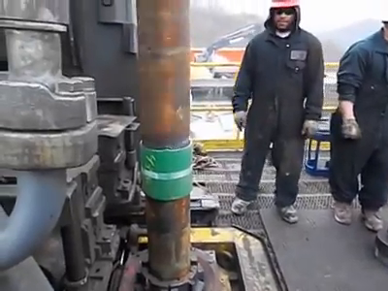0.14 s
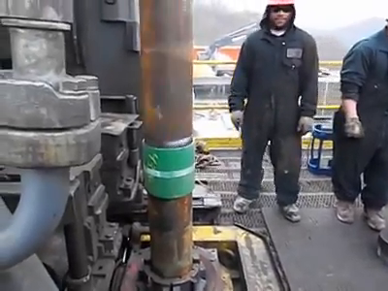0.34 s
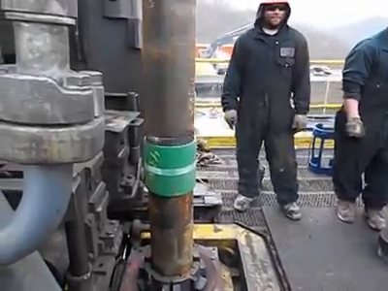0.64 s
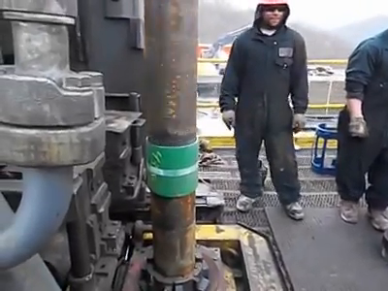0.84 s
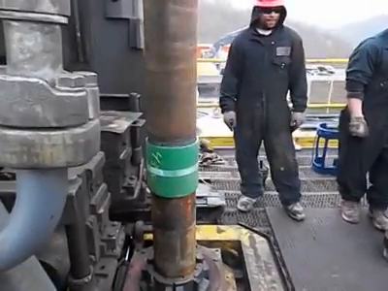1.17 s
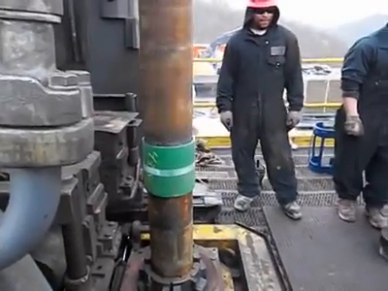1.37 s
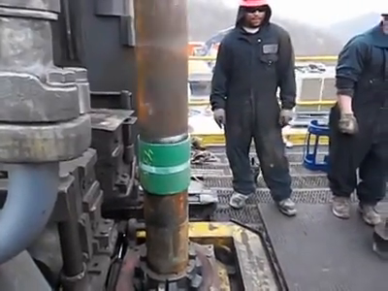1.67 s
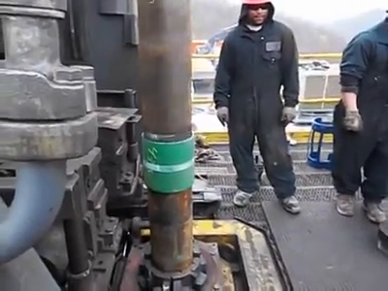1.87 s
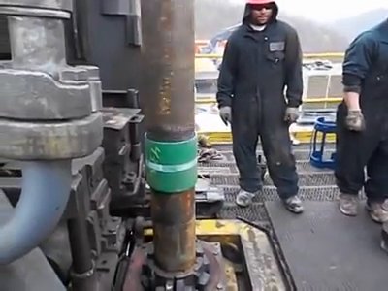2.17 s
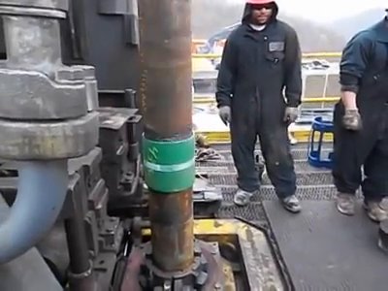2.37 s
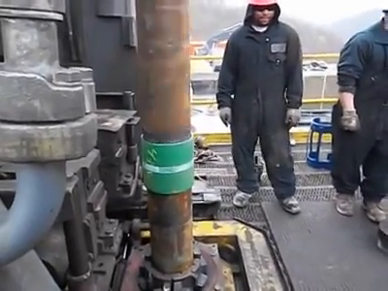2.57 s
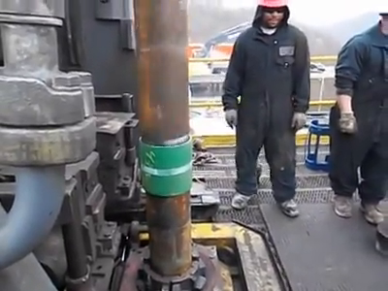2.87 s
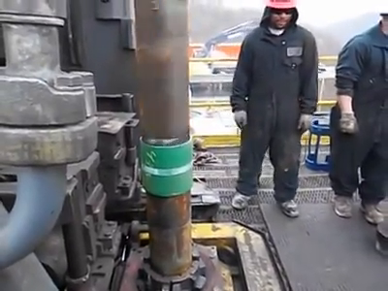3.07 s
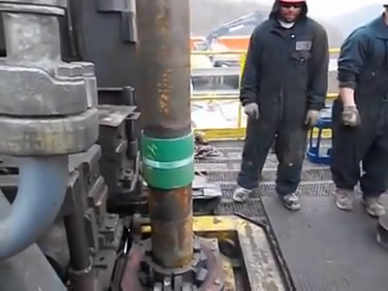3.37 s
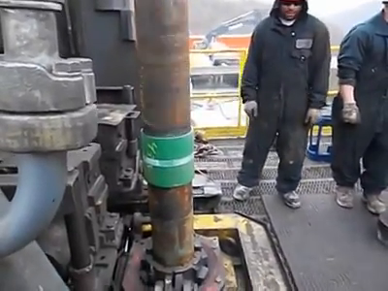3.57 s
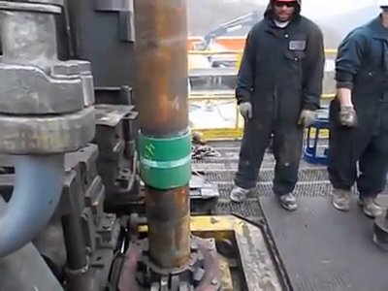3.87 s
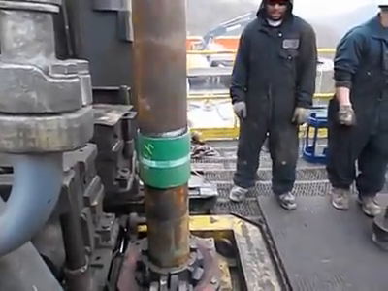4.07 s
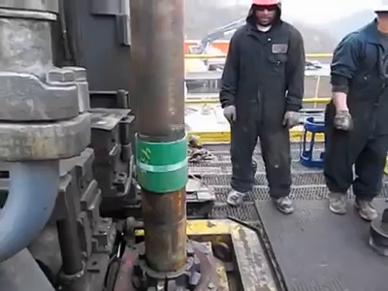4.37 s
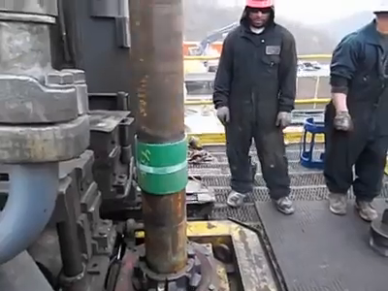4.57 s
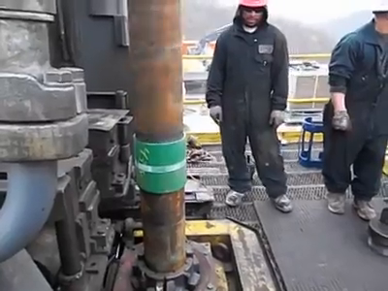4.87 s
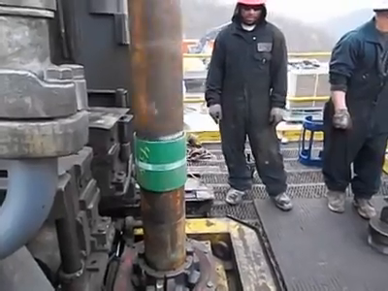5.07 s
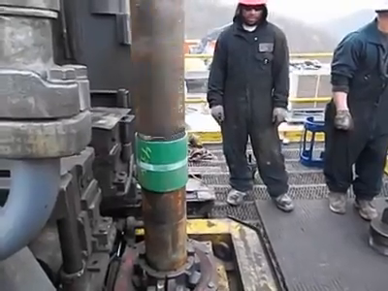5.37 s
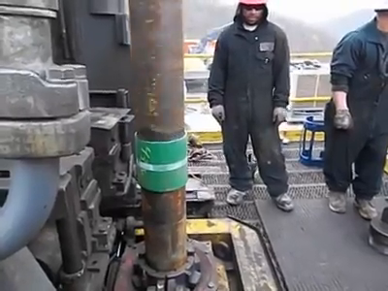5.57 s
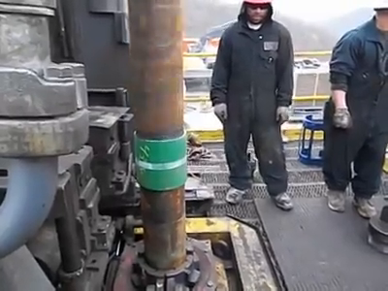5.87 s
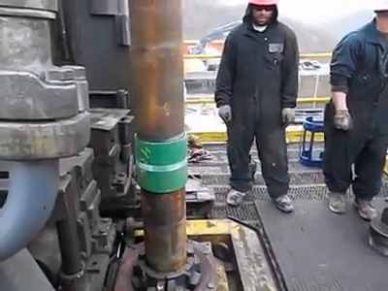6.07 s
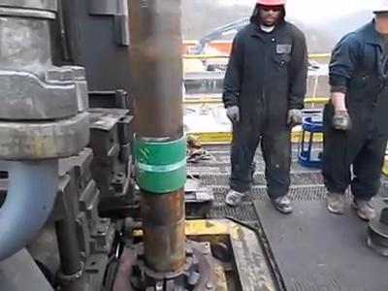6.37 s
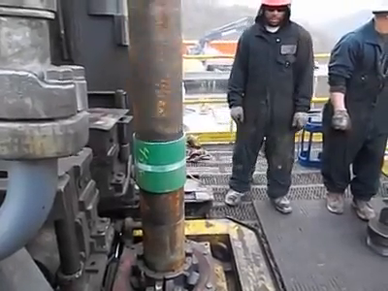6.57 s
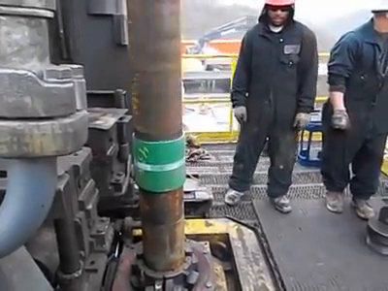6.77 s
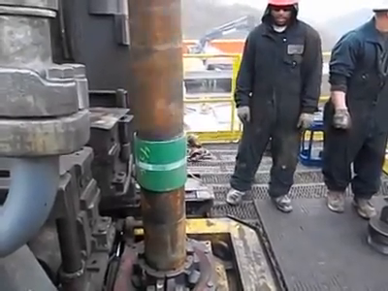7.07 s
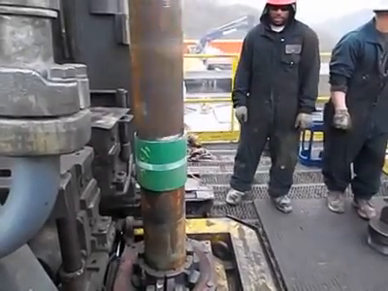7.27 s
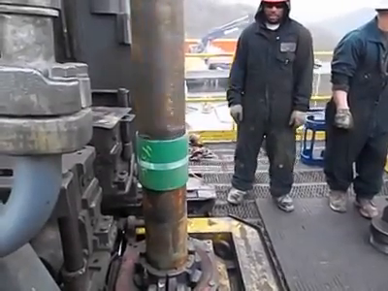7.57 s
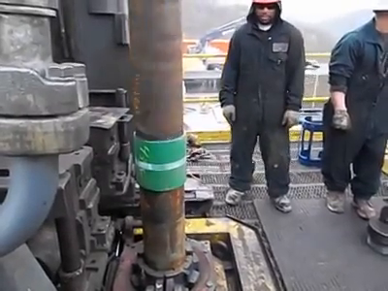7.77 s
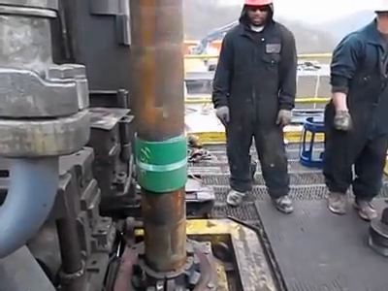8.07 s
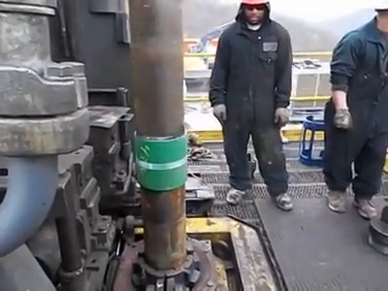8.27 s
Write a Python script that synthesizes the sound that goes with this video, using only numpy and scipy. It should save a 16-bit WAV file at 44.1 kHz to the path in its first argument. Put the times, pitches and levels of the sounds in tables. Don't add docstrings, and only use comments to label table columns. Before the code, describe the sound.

From start to end a diesel runs at constant speed, a dense, rough drone with a rapid flutter of about thirty pulses a second, under a thick midrange roar of air and oil. A geared hydraulic pump whines around 1.6 to 2.2 kHz, its tones swelling strongest in the first three seconds. Light knocks come at 0.3-0.5 s, a hard cluster at 1.05-1.2, and a deck boom near 1.5. A motor hums in spurts around 320 Hz, clearest at 2-3 s, while knocks are sparse. Heavy thuds with loose rattling hit at 4.1 and 4.5-5.05 s. Low booms continue from 5.6 to 6; the biggest blow lands at 6.6-6.7, with more at 6.9 and 7.2. A low deck shudder swells near 7.9, and the drone continues to 8.4. Faint wind buffets the small microphone, which clips, ducks after blows and lacks high treble.

```python
import sys
import numpy as np
from scipy import signal
from scipy.fft import irfft
from scipy.io import wavfile
from scipy.ndimage import uniform_filter1d, map_coordinates

SR = 44100
rng = np.random.default_rng(int(sys.argv[2]) if len(sys.argv) > 2 else 0)


def bounce(signal):
    frames = np.transpose(np.atleast_2d(signal))
    limited = np.clip(frames, -1, 1)
    pcm = np.round(limited * 32767).astype(np.int16)
    wavfile.write(sys.argv[1], SR, pcm)


def invert_db(level):
    return 10 ** (np.asarray(level, dtype=float) / 20)


N = 371763

# t/s, f/Hz
CYCLE_RATE = [(0.15, 15.012), (0.6, 15.022), (1.1, 15.0), (1.65, 14.905), (1.95, 14.958), (3.45, 15.0),
              (4.8, 14.99), (6.3, 14.953), (6.9, 14.975), (7.6, 14.952), (7.95, 14.915), (8.25, 14.936)]
# t/s, peak level/dB, f/Hz
KNOCKS = [(0.288, -14, 270), (0.375, -11, 272), (0.549, -18, 200), (1.049, -3, 305), (1.117, -9, 204),
          (1.158, -11, 250), (1.191, -9.5, 273), (1.482, -14, 202), (1.992, -18, 295.7), (2.106, -17, 323),
          (2.314, -17.5, 310), (3.623, -11, 310), (4.119, -1, 297), (4.318, -10, 301), (4.532, -4, 235),
          (4.597, -9, 324), (4.625, -11, 300), (4.713, -3.5, 217), (4.934, -2.5, 270), (4.987, -7, 287),
          (5.043, -8.5, 235), (6.26, -11, 202), (6.63, 0, 295.8), (6.713, -9, 202), (6.739, -14, 202),
          (6.909, -3.5, 239), (7.19, -5, 289), (7.654, -23, 323)]


def rms_one(x):
    return x / np.sqrt(np.mean(x ** 2) + 1e-20)


def at_hz(points, hz):
    f, db = np.transpose(points)
    return np.interp(np.log(hz), np.log(f), db)


def drift(rate):
    r = np.exp(-80 * np.pi * rate / SR)
    slow = signal.lfilter([1], [1, -2 * r, r * r], rng.standard_normal(N // 40 + 2002))[2000:]
    return np.interp(np.arange(N) / 40, np.arange(len(slow)), rms_one(slow))


def band(x, low_hz, high_hz):
    return signal.sosfilt(signal.butter(2, [low_hz, high_hz], "band", fs=SR, output="sos"), x)


def swells(rows, rest_db, fade_s, t):
    power = invert_db(2 * rest_db) + 0 * t
    for start, length, *_, db in rows:
        inside = np.minimum(t - start, start + length - t) / fade_s + .5
        power = power + invert_db(2 * db) * np.clip(inside, 0, 1) ** 2
    return 10 * np.log10(power)


def drive_train(turns, scatter_db, unsteady, memory):
    # multiple of the cycle rate, rms level/dB
    strong_orders = [(6, -34), (10, -23), (12, -21), (14, -38), (18, -33), (20, -35), (21, -33), (28, -34),
                     (30, -34), (32, -39), (39, -38), (44, -38), (45, -39), (46, -37), (47, -40), (51, -35),
                     (52, -39), (54, -31), (58, -39), (60, -37), (66, -36), (67, -36), (69, -38), (70, -40),
                     (74, -41), (81, -42), (90, -40), (102, -41), (118, -41), (124, -40)]
    # f/Hz, rms level/dB of each
    weak_orders = [(30, -57), (100, -41.5), (300, -37.5), (500, -45.5), (1000, -47.5), (1300, -55),
                   (1600, -47.5), (1800, -48), (1980, -44.5), (2200, -59.5), (3400, -60)]
    # pump harmonic, rms level/dB
    steady_whine = [(9, -51), (10, -49)]
    whine_rest = [-41.5, -39, -37, -45.5]
    # start t/s, length t/s, rms level/dB
    whine_swells = [
        [(1.45, .33, -31), (5.6, .55, -39), (7.85, .35, -31.5)],
        [(0.0, 1.0, -31.5), (1.4, 1.15, -32), (3.2, 2.25, -33), (5.5, 1.0, -36.5), (7.6, .8, -40.5)],
        [(0.0, 1.3, -31.5), (1.72, 1.0, -28.5), (3.2, .9, -34), (4.4, 1.72, -36), (8.2, .3, -34.5)],
        [(0.2, .9, -38.5), (2.3, .4, -37.5), (3.2, 1.3, -43), (5.1, 1.0, -37), (7.95, .5, -37.5)],
    ]
    piston_order = 21
    count, size = int(turns[-1]) + 2, 4096
    orders = np.arange(1, 231)
    starts = np.interp(np.arange(count), turns, np.arange(N) / SR)

    scatter = np.clip(rng.standard_normal(len(orders)), -2, 1.3)
    level_db = at_hz(weak_orders, orders * CYCLE_RATE[0][1]) + scatter_db * scatter
    strong_at = [round(order) - 1 for order, db in strong_orders]
    level_db[strong_at] = [db for order, db in strong_orders]
    for k, db in steady_whine:
        level_db[round(k) * piston_order - 1] = db
    level_db = np.tile(level_db, (count, 1))
    singing = [swells(rows, rest_db, 0.09, starts) for rows, rest_db in zip(whine_swells, whine_rest)]
    level_db[:, np.arange(5, 9) * piston_order - 1] = np.transpose(singing)

    chance = rng.standard_normal((count + 20, len(orders), 2)) @ [1, 1j]
    r = np.clip(memory, 0, .97)
    wander = signal.lfilter([np.sqrt((1 - r * r) / 2)], [1, -r], chance, axis=0)[20:]
    share = unsteady * np.minimum(orders / 40, 1) ** 0.44
    share[np.arange(5, 11) * piston_order - 1] *= .55
    share[strong_at] *= .55

    phase = rng.random(len(orders)) * ~np.isin(orders, [10, 12])
    unsteadiness = (1 + share * wander) / np.sqrt(1 + share ** 2)
    lines = np.zeros((count, size // 2 + 1), complex)
    lines[:, orders] = invert_db(level_db) * np.exp(2j * np.pi * phase) * unsteadiness
    cycles = irfft(lines, axis=1) * size / np.sqrt(2)
    cycles = np.hstack([cycles, cycles[:, :1]])
    return map_coordinates(cycles, [turns, turns % 1 * size], order=1)


def other_drives(wobble_hz, sway_db):
    # f/Hz, rms level/dB
    hums = [(43, -47.5), (558, -35), (585, -44.5), (7716, -66)]
    t = np.arange(N) / SR
    out = 0
    for hz, db in hums:
        strength = invert_db(db + sway_db * drift(0.78)) * np.sqrt(2)
        cycles = hz * t + wobble_hz * np.cumsum(drift(1.74)) / SR
        out = out + strength * np.sin(2 * np.pi * cycles)
    return out


def roar(turns, patchy_db, throb_db, clatter_db):
    # f/Hz, density level/dB
    turbulence = [(15, -47), (25, -23.5), (60, -14), (110, -17), (170, -9), (260, -4.5), (350, -11),
                  (620, -13.5), (1000, -13.5), (1400, -16), (1930, -13.5), (2400, -22), (3700, -22),
                  (5000, -33.5), (9000, -54)]
    white = rng.standard_normal((2, N))
    edges = 24 * 2 ** np.arange(0, 8.6, 1 / 3)
    firing = 6 * turns
    strength = rng.exponential(1, int(firing[-1]) + 1)[firing.astype(int)]
    throb = throb_db * np.cos(4 * np.pi * turns)
    pulse = clatter_db * strength * np.exp(-3.0 * (firing % 1))
    together = .5 * drift(6) + 1.0 * drift(18)
    out = 0
    for k, (low, high) in enumerate(zip(edges, edges[1:])):
        hz = np.sqrt(low * high)
        exhaust = np.exp(-np.log2(hz / 700) ** 2 / 2.0)
        flicker = patchy_db * (together + drift(13))
        level_db = at_hz(turbulence, hz) + flicker + pulse + exhaust * throb
        out = out + invert_db(level_db) * band(white[k % 2], low, high)
    return invert_db(-18.5) * rms_one(out)


def exhaust_pops(turns):
    low_hz, high_hz = 200, 1090
    at = np.flatnonzero(np.diff(np.floor(2 * turns - .07)))
    kicks = np.zeros(N)
    kicks[at] = -invert_db(5 * np.clip(rng.standard_normal(len(at)), -2, 1.5))
    shape = band(np.eye(1, SR // 20)[0], low_hz, high_hz)
    return invert_db(-15.5) * band(kicks + 1e-18, low_hz, high_hz) / shape.max()


def housing():
    # f/Hz, bandwidth f/Hz, rms level/dB
    casting_modes = [(988.4, 58, -32), (539.7, 50, -35)]
    out = 0
    for hz, width, db in casting_modes:
        sway = invert_db(db + 2.0 * drift(2.2))
        out = out + sway * rms_one(band(rng.standard_normal(N), hz - width / 2, hz + width / 2))
    return out


def wind():
    # start t/s, length t/s, rms level/dB
    gusts = [
        (1.3, 0.21, -27),
        (3.38, 0.14, -27),
        (4.72, .12, -27),
        (7.3, .12, -25),
    ]
    lumps = band(rng.standard_normal(N), 46, 72)
    return invert_db(swells(gusts, -31, .05, np.arange(N) / SR)) * rms_one(lumps)


def spinner():
    # start t/s, length t/s, f/Hz, rms level/dB
    spurts = [(0.0, 0.17, 325.3, -28.5), (1.5, .2, 324.8, -29), (1.96, .3, 318, -25.5),
              (2.365, 0.27, 320, -22), (2.804, .2, 315.7, -25), (4.053, .14, 325, -25),
              (4.32, .35, 319.2, -31), (5.2, 0.37, 323.2, -26.5), (6.586, .1, 324, -23),
              (7.149, 0.11, 319.8, -28), (8.246, 0.11, 325.4, -28)]
    t, rows = np.arange(N) / SR, np.array(spurts)
    hz = np.interp(t, rows[:, 0] + rows[:, 1] / 2, rows[:, 2])
    tone = np.sqrt(2) * np.sin(2 * np.pi * np.cumsum(hz) / SR)
    return invert_db(swells(spurts, -33.5, 0.035, t)) * tone


def surges():
    # t/s, rise level/dB
    bindings = [(0.39, 1.5), (0.55, 2), (1.37, 1.5), (1.49, 1.6), (1.66, 3.0), (1.81, 1.5), (2.34, 1.5),
                (2.52, 2), (3.45, 3), (4.0, 2.5), (4.31, 3), (4.92, 2.3), (5.29, 1.5), (5.46, 2.0),
                (6.06, 3), (6.22, 3.5), (7.1, 3), (7.37, 3.3), (7.92, 3.5), (8.3, 2.5)]
    t = np.arange(N) / SR
    return invert_db(sum(db * np.exp(-.5 * ((t - s) / 0.02) ** 2) for s, db in bindings))


def gain_control():
    # t/s, depth level/dB
    ducks = [(0.14, 3), (0.62, 3.5), (1.03, 5.5), (1.14, 4), (1.2, 3), (2.19, 4.5), (2.66, 0.5), (3.04, 3),
             (3.7, 1.5), (3.77, 1.5), (4.1, 6), (4.54, 5.5), (4.59, 2), (4.92, 6), (4.99, 4.5), (5.05, 7),
             (5.3, 2.5), (5.58, 2), (5.78, 1), (6.09, 0.7), (6.28, 2.5), (6.47, -0.4), (6.61, 3),
             (6.72, 6.0), (6.77, 1.5), (6.9, 3.5), (7.18, 7), (7.39, 1.4), (7.76, 0.5), (8.16, 1.5)]
    fall_s, recover_s = 0.042, 0.082
    t = np.arange(N) / SR
    gain_db = 0.52 * drift(8.0)
    for s, db in ducks:
        fall = np.clip((t - s) / fall_s, 0, 1)
        recovery = np.exp(-np.maximum(t - s - fall_s, 0) / recover_s)
        gain_db = gain_db - db * fall * recovery
    return invert_db(gain_db - gain_db.mean())


def deck():
    # start t/s, length t/s, rms level/dB
    shudders = [
        (0.5, .33, -25),
        (1.05, 0.65, -27),
        (4.05, 1.13, -28),
        (4.5, .25, -23),
        (6.32, .12, -25.5),
        (6.55, 1.0, -27.5),
        (7.85, 0.27, -22),
    ]
    shudder = band(rng.standard_normal(N), 91, 117)
    return invert_db(swells(shudders, -37, 0.14, np.arange(N) / SR)) * rms_one(shudder)


def blows(events, modes, rise_s):
    out, t = np.zeros(N + SR), np.arange(SR // 3) / SR
    for s, db, hz in events:
        at = round((s - 0.95 * rise_s - .001) * SR)
        for share, mode_db, t60 in modes:
            shape = (1 - np.exp(-t / rise_s)) ** 2 * invert_db(-60 * t / t60)
            ring = shape / shape.max() * np.sin(2 * np.pi * share * hz * t)
            out[at:at + len(t)] -= invert_db(db + mode_db) * ring
    return out[:N]


def pipe_knocks():
    # share of pitch, level/dB, decay time t60/s
    pipe_modes = [(.52, -2, .035), (.8, -5, .05), (1.04, -1, .04), (1.7, -9, .025), (2.6, -13, .015)]
    return band(blows(KNOCKS, pipe_modes, rise_s=.0006), 90, 6000)


def rattle(t60, level_db):
    kicks = np.zeros(N)
    kicks[[round(s * SR) for s, db, hz in KNOCKS]] = invert_db(np.array(KNOCKS)[:, 1] + level_db)
    fading = signal.lfilter([1], [1, -invert_db(-60 / (t60 * SR))], kicks + 1e-18)
    return fading * rms_one(band(rng.standard_normal(N), 190, 420))


def deck_booms():
    # t/s, peak level/dB, f/Hz
    booms = [(0.346, -15, 85.5), (0.506, -10, 108.2), (0.798, -13, 106.3), (1.093, -9, 102),
             (1.153, -13, 93), (1.47, -5, 121.5), (1.775, -13, 97), (3.952, -12.5, 109.4),
             (4.064, -9, 87.6), (4.111, -11, 91.2), (4.165, -11, 106), (4.28, -18, 94.6),
             (4.479, -28, 103.3), (4.577, -7, 103.5), (4.633, -5, 104.4), (4.861, -14, 94),
             (4.977, -11, 95), (5.623, -8, 107.4), (5.78, -20, 98), (5.852, -29, 120.6), (5.95, -12, 117),
             (6.03, -9.5, 94.5), (6.559, -15, 103), (6.683, -0.5, 97.5), (6.729, -11, 95.6),
             (6.914, -26, 95.5), (6.957, -7, 106.9), (7.234, -11.5, 102.5), (7.846, -31, 102),
             (7.91, -16.5, 109.6)]
    # share of pitch, level/dB, decay time t60/s
    plate_modes = [(0.99, -7.5, 0.27)]
    return blows(booms, plate_modes, rise_s=.012)


def colour_and_split(mono, hole_share, top_share, top_db, split_db):
    # f/Hz, width f/Hz, level/dB
    casing = [(3680, 370, 0), (5130, 120, 5.5), (5530, 190, 5.5), (6140, 350, 4.5), (6560, 17, 10),
              (6850, 36, 4), (7020, 47, 4.5), (7070, 25, 8.5)]
    # t/s, length t/s
    splits = [(0.0, 0.07), (0.386, 0.148), (0.636, 0.084), (0.91, 0.09), (1.048, 0.086), (1.933, 0.226),
              (3.099, 0.127), (3.283, 0.085), (3.651, 0.088), (3.741, 0.09), (4.341, 0.094), (4.663, 0.098),
              (5.095, 0.081), (5.187, 0.27), (5.917, 0.096), (6.428, 0.152), (7.037, 0.139), (7.278, 0.13),
              (7.638, 0.096), (8.022, 0.079)]
    cutoff_hz = 8070
    lead, size = 860, 4096
    hz, s, frames = signal.stft(np.pad(mono, (lead, 0)), SR, "cosine", size)
    hz, s = hz[:, None], s - lead / SR

    narrow = (hz[:, 0] // 86).astype(int)
    luck = uniform_filter1d(rng.standard_normal((narrow[-1] + 1, len(s))), size=3, axis=1)[narrow] * 1.7
    holes = (luck > 2.1 - hole_share * (hz / 6000) ** 2) & (hz > 3800) & (hz < 6500)
    colour_db = sum(db * np.exp(-((hz - peak_hz) / width) ** 2) for peak_hz, width, db in casing)
    rolloff_db = -np.clip((hz - 7200) / 150, 0, 4) - np.clip((hz - 7800) / 18, 0, 9)
    frames = frames * invert_db(colour_db) * np.where(holes, .03, 1) * invert_db(rolloff_db)

    kept = uniform_filter1d(rng.standard_normal(len(s)), size=2) < top_share
    frames = frames * np.where(hz > cutoff_hz + 80, invert_db(top_db) * kept * (hz < 8650), 1)

    apart = sum((s > start + .03) & (s < start + length - .03) for start, length in splits) > 0
    wide = np.minimum(np.log2(1 + hz[:, 0] / 700) * 4, 10.6).astype(int)
    odds = np.where(np.arange(11) < 10, .33, .95)[:, None]
    chosen = (rng.random((11, len(s))) < odds)[wide]
    error_level = invert_db(split_db + 2 * np.minimum(hz / 5000, 1) ** 2) * np.abs(frames)
    error = error_level * np.exp(2j * np.pi * rng.random(frames.shape))
    side = error * apart * chosen * (hz > 90) * (hz < cutoff_hz)
    both = np.array([frames + side, frames - side])
    return signal.istft(both, SR, "cosine", size)[1][:, lead:lead + N]


def scene():
    t = np.arange(N) / SR
    turns = np.cumsum(np.interp(t, *np.transpose(CYCLE_RATE))) / SR + .21
    machines = drive_train(turns, scatter_db=4.5, unsteady=0.79, memory=0.882)
    machines = machines + other_drives(wobble_hz=0.83, sway_db=0.5)
    machines = machines + roar(turns, patchy_db=.7, throb_db=2.8, clatter_db=.8)
    machines = machines + exhaust_pops(turns) + housing()
    steady = (machines * surges() + wind() + spinner()) * gain_control() * invert_db(-.5)
    pipe = pipe_knocks() + deck_booms() + rattle(t60=.5, level_db=-14.5)
    mono = steady + pipe + deck()
    return np.array([mono, mono])


def roll_off(x):
    return signal.sosfilt(signal.butter(12, 8520, fs=SR, output="sos"), x)


def record(dry):
    clipped = np.clip(dry[0], -1.05, 1.05)
    x = colour_and_split(clipped, hole_share=1.25, top_share=-.1, top_db=-1, split_db=-15.5)
    return roll_off(np.clip(x, -1, 1))


dry = scene()
out = record(dry)
bounce(out)
```